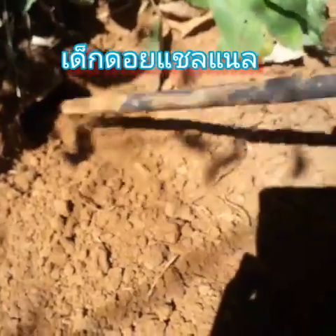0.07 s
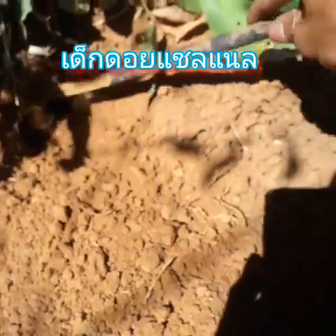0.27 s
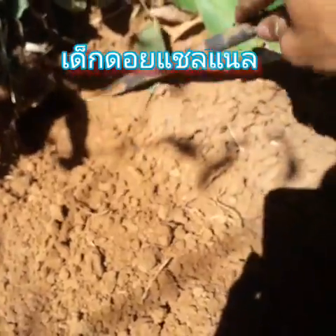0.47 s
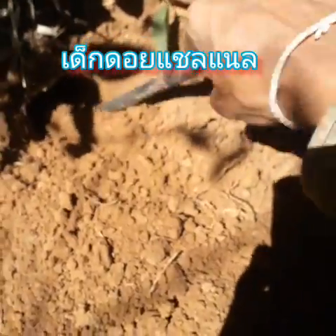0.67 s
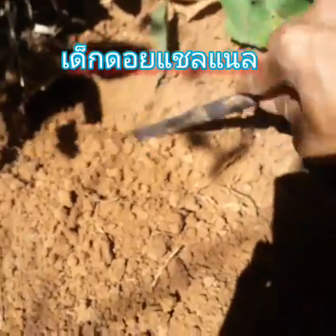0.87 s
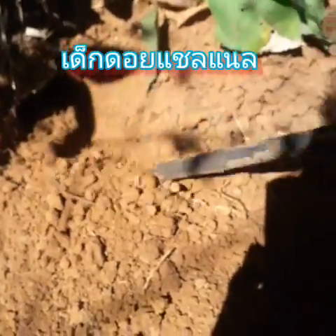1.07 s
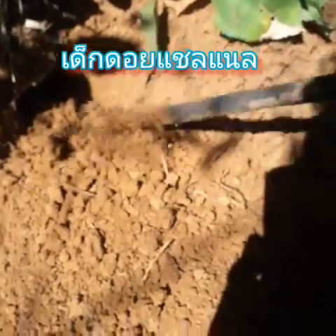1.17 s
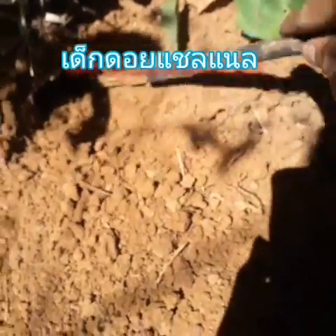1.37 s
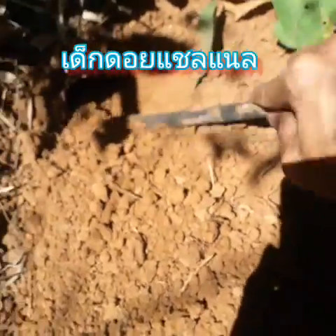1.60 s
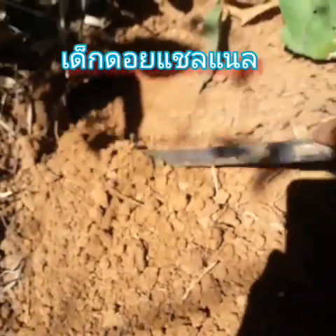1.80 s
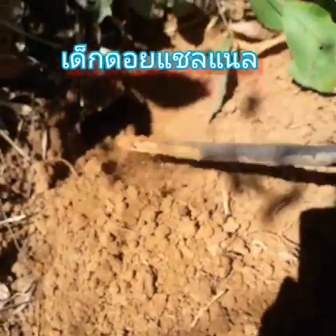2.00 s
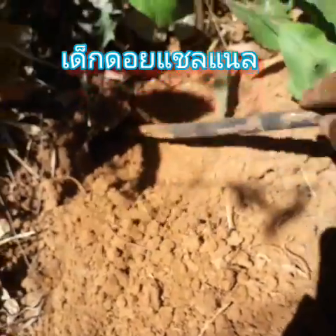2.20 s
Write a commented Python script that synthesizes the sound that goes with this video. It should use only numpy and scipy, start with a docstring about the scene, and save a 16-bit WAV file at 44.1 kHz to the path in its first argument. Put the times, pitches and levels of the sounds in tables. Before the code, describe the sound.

Digging dry earth with a hand-held blade, which knocks and drags as small clods tumble.

```python
"""A hand-held steel digging blade works dry, loose soil close by, over quiet air and faint far chirps.
At 0.2 s it strikes with a dead knock and a thud of the ground, scrapes over a hard crust, then pries
and drags through the earth: crumbs roll, sand ticks, small clods tap the steel. At 1.4 s the edge
cracks into the bank and splits a clod; a second, shorter drag follows and the soil settles."""
import sys
import numpy as np
from scipy import signal
from scipy.fft import rfft, irfft
from scipy.io import wavfile
from scipy.ndimage import uniform_filter1d, map_coordinates

SR = 44100
rng = np.random.default_rng(int(sys.argv[2]) if len(sys.argv) > 2 else 0)


def output_pcm(signal):
    """Save a mono or channel-first signal as 16-bit PCM at the path in sys.argv[1].

    Samples are clipped to [-1, 1] before scaling.
    """
    pcm = np.clip(np.atleast_2d(signal).T, -1, 1) * 32767
    wavfile.write(sys.argv[1], SR, np.round(pcm).astype(np.int16))


N = 99225

# loose earth on the move: t/s, crumb level/dB, lump level/dB, sand level/dB
EARTH_FLOW = [(0, -70, -66.5, -88), (.035, -63.5, -81, -79.5), (.09, -80, -80.5, -94),
              (.205, -99, -86, -85), (.225, -55, -56, -65), (.30, -75.5, -80.5, -81),
              (.39, -56, -68.5, -65), (.44, -67.5, -84, -75), (.51, -58, -70.5, -68.5),
              (.58, -59.5, -73.5, -72), (.67, -61.5, -71, -75), (.77, -67.5, -68, -78),
              (.88, -57.5, -62, -78), (.98, -59, -62, -74.5), (1.04, -64, -70.5, -78),
              (1.12, -63.5, -78.5, -81), (1.19, -67, -91, -75), (1.25, -65, -76, -79),
              (1.33, -74, -81, -91), (1.397, -86, -84, -74), (1.404, -50, -52, -43),
              (1.435, -47.5, -61.5, -56), (1.47, -57.5, -69, -66), (1.50, -49.5, -67, -64),
              (1.55, -60, -72.5, -65), (1.62, -67.5, -77, -76.5), (1.71, -59.5, -66, -69),
              (1.80, -57.5, -69.5, -62.5), (1.88, -58, -72, -66), (1.94, -65, -77.5, -72.5),
              (2.08, -77, -80.5, -95), (2.14, -69, -80.5, -82), (2.21, -77, -84, -81.5),
              (2.25, -72, -79, -79)]
# bright EQ of hard grit on steel: f/Hz, level/dB
GRIT_EQ = [(200, -11), (6000, -27.5), (10000, -28), (11300, -10), (13000, -3), (15500, -1), (17000, 0.5)]


def undb(db):
    """Decibels to gain."""
    return 10 ** (np.asarray(db) / 20)


def unit(x):
    """Scale to rms 1."""
    return x / np.sqrt(np.mean(x ** 2) + 1e-30)


def unit_hit(x):
    """Scale a one-shot to the energy of 10 ms at rms 1."""
    return x / np.sqrt(np.sum(x ** 2) / (SR / 100) + 1e-30)


def clock(size=8192):
    """Seconds since the start of a sound."""
    return np.arange(size) / SR


def add(out, at_s, x):
    """Mix x in at a cue time."""
    start = int(at_s * SR)
    out[start:start + len(x)] += x[:max(len(out) - start, 0)]


def fader(rows, column=1):
    """Gain over the scene from a table's dB column."""
    rows = np.array(rows)
    return undb(np.interp(clock(N), rows[:, 0], rows[:, column]))


def eq(x, points, size=2048):
    """Minimum-phase EQ through (f/Hz, level/dB) points, falling 20 dB an octave beyond the ends."""
    hz, db = np.array(points, float).T
    octave = np.log2(np.maximum(np.arange(size // 2 + 1) * SR / size, 10))
    outside = np.maximum(np.log2(hz[0]) - octave, 0) + np.maximum(octave - np.log2(hz[-1]), 0)
    cepstrum = irfft(np.log(undb(np.interp(octave, np.log2(hz), db) - 20 * outside)))
    cepstrum[1:size // 2] *= 2
    cepstrum[size // 2 + 1:] = 0
    return signal.fftconvolve(x, irfft(np.exp(rfft(cepstrum))))[:len(x)]


def lowpass(x, hz, order=2):
    """Dull the top."""
    return signal.sosfilt(signal.butter(order, hz, fs=SR, output="sos"), x)


def highpass(x, hz, order=3):
    """Thin the bottom."""
    return signal.sosfilt(signal.butter(order, hz, "high", fs=SR, output="sos"), x)


def burst(decay_s):
    """Grit crushed in a moment: dying noise with an even spectrum."""
    envelope = np.exp(-clock() / decay_s)
    noise = rng.standard_normal(len(envelope))
    for _ in range(2):  # flatten the spectrum, then the level
        noise = irfft(np.exp(1j * np.angle(rfft(noise * envelope))))
        noise /= np.sqrt(uniform_filter1d(noise ** 2, size=64).clip(1e-30))
    return unit_hit(noise * envelope)


def ring(modes):
    """Damped modes (f/Hz, t60/s, level/dB) after one push."""
    t = clock()
    return unit_hit(sum(undb(db - 60 * t / t60) * np.sin(2 * np.pi * hz * t) for hz, t60, db in modes))


def attack(rise_s):
    """Fade-in that rounds off a transient."""
    return 1 - np.exp(-clock() / rise_s)


def grains(per_s, lo_hz, hi_hz, cycles, spread_db, size=320):
    """A rain of tiny collisions, each with its own pitch and weight, dying to 1/e in `cycles`."""
    when, pitch, rank, phase = rng.random((int(per_s * N / SR), 4)).T[:, :, None]
    hz, t = lo_hz * (hi_hz / lo_hz) ** pitch, clock(size)
    gain = hz * undb(-spread_db * np.log(rank + 0.032))
    pings = gain * np.exp(-t * hz / cycles) * np.sin(2 * np.pi * (hz * t + phase))
    positions = (when * N).astype(int) + np.arange(size)
    return np.bincount(positions.ravel(), pings.ravel(), N + size)[:N]


def wobble(hz):
    """Random movement slower than about hz, at rms 1."""
    return unit(lowpass(rng.standard_normal(N), hz))


def slips(hz, max_db):
    """Gain flutter of earth giving way in small uneven slips."""
    return undb(max_db * np.tanh(wobble(hz) / 2))


def noise_bed(points, db):
    """Steady EQ'd noise at an rms level."""
    return undb(db) * unit(eq(rng.standard_normal(N), points))


def scatter(x, decay_s):
    """Smear a sound with dense, short reflections."""
    echo = burst(decay_s)
    return signal.fftconvolve(x, echo / np.linalg.norm(echo))[:N]


def outdoors():
    """Quiet air with a soft low rumble and a faint, narrow far whine."""
    air_eq = [(15, -32), (25, -18.5), (117, 7), (256, -13), (714, -9), (1290, -4), (1700, -11.5),
              (2280, -8.5), (3250, -24.5), (4490, -1.5), (5880, -8), (6740, -6), (9320, -22),
              (14800, -15.5), (16000, -15)]  # open air: f/Hz, level/dB
    rumble_eq = [(25, -23.5), (55, -4.5), (100, -3), (160, -0.5), (260, -20), (1000, -60.5)]  # low rumble: f/Hz, level/dB
    whine = unit(wobble(70) * np.sin(2 * np.pi * 1297 * clock(N)))
    return noise_bed(air_eq, db=-70.5) + noise_bed(rumble_eq, db=-75.5) + undb(-78.5) * whine


def far_chirps(trim_db=-3.5, fall_share=0.03):
    """Thin, raspy, slightly falling chirps from far off, blurred by the foliage."""
    calls = [(0.026, 0.02, 2134, -61, 0.025), (0.415, 0.034, 6800, -69, 0.027),
             (0.487, 0.072, 6260, -67, 0.016), (.73, 0.057, 7100, -68.5, 0.041),
             (1.024, 0.064, 7230, -68, .04), (1.188, 0.059, 7130, -66.5, 0.043),
             (1.337, 0.066, 7100, -69, 0.025), (1.637, 0.047, 6970, -68, 0.036),
             (1.751, 0.13, 6350, -62.5, 0.014), (1.947, 0.07, 7050, -70, .04),
             (2.112, 0.077, 6900, -70.5, 0.038)]  # t/s, length/s, f/Hz, level before trim/dB, rasp/share of pitch
    out = np.zeros(N)
    for at, length, hz, db, rasp in calls:
        n = int(length * SR)
        pitch = hz * (1 + rasp * wobble(500)[:n] + fall_share * np.linspace(.5, -.5, n))
        tone = np.sin(2 * np.pi * np.cumsum(pitch) / SR)
        add(out, at, undb(db + trim_db) * unit(np.hanning(n) ** .5 * tone))
    return scatter(out, decay_s=0.012)


def running_sand():
    """Fine sand runs over the steel in a high sizzle."""
    sand = eq(grains(per_s=3000, lo_hz=9500, hi_hz=17300, cycles=3.4, spread_db=3), GRIT_EQ)
    return fader(EARTH_FLOW, column=3) * unit(sand * slips(120, max_db=4))


def tumbling_lumps():
    """Bigger lumps tumble with a low patter."""
    lump_eq = [(60, 5.5), (130, -2.5), (350, 3.5), (520, -2), (720, -9), (1100, -3), (1600, -19.5),
               (4000, -33)]  # dull body of the lumps: f/Hz, level/dB
    lumps = grains(per_s=1500, lo_hz=104, hi_hz=1860, cycles=1.64, spread_db=1.5, size=900)
    return fader(EARTH_FLOW, column=2) * unit(eq(lumps, lump_eq))


def rolling_crumbs():
    """Dry crumbs roll and collide in a dense rustle."""
    crumb_eq = [(410, -46.5), (700, -11), (861, -12), (1070, -8.5), (1400, -9), (2090, -3.5), (2400, 0),
                (2820, -2.5), (3130, -5.5), (3470, -1), (5080, -6), (6470, -5.5), (8740, -16), (9470, -27),
                (11000, -39), (14300, -59.5)]  # dry rustle: f/Hz, level/dB
    crumbs = eq(grains(per_s=4500, lo_hz=690, hi_hz=10740, cycles=1.72, spread_db=0.5), crumb_eq)
    return fader(EARTH_FLOW, column=1) * unit(crumbs * slips(90, max_db=2))


def blade_drag(stroke_s=1.2, in_tune_s=0.78, sag_per_s=0.25):
    """Crumbs drag along the flat of the blade; its resonances sag as each stroke draws it back."""
    strokes = [(.60, -72), (.66, -60), (.78, -56.5), (.88, -55), (.98, -56.5), (1.05, -60.5), (1.14, -84),
               (1.66, -69.5), (1.78, -62.5), (1.89, -61.5), (1.96, -75)]  # swell of the two strokes: t/s, level/dB
    body_eq = [(700, -23.5), (1110, -2), (1400, -19.5), (1760, -5), (2100, -11), (2600, 0), (2900, 1),
               (3150, -4), (3500, -0.5), (4000, -5), (4600, -18), (8000, -29)]  # blade resonances before the pitch bend: f/Hz, level/dB
    crumbs = eq(grains(per_s=4000, lo_hz=802, hi_hz=7160, cycles=4.1, spread_db=0.5), body_eq)
    speed = np.exp(-sag_per_s * (clock(N) % stroke_s - in_tune_s))
    bent = map_coordinates(crumbs, [np.cumsum(speed)], mode="mirror")
    return fader(strokes) * unit(bent * slips(110, max_db=4))


def crust_scrape():
    """Dense catches of steel on a hard crust, pressed harder until the blade slips free."""
    pressure = [(.3305, -75), (.3325, -48.5), (.338, -51.5), (.347, -48.5), (.356, -41.5), (.3595, -52),
                (.366, -72)]  # swell of the slide: t/s, level/dB
    crust_eq = [(200, -20), (600, -25), (1300, -12), (1600, -24), (2100, -9), (2550, 0.5), (3100, -7.5),
                (3850, -1), (5000, -9), (6600, -6), (7500, -5), (8700, -6.5), (10300, -31), (13500, -15),
                (16000, -23)]  # steel on crust: f/Hz, level/dB
    t = clock(N)
    touching = (t > pressure[0][0]) & (t < pressure[-1][0])
    catches = grains(per_s=6000, lo_hz=920, hi_hz=15500, cycles=1.8, spread_db=1)
    return touching * fader(pressure) * unit(eq(catches, crust_eq))


def crumb_clicks(ring_cycles=17, note_db=0.5):
    """Single crumbs click on the blade, each with its own brief pitch; hard grit adds a sharp tick."""
    cues = [(0.216, -39, 3680, -52, 0.0035), (.3553, -47, 3900, -68, .0015),
            (.3805, -44.5, 6500, -72, 0.003), (0.4712, -57, 3000, -66, 0.004),
            (0.499, -51.5, 2870, -76, 0.004), (0.5609, -59.5, 6600, -75, 0.002),
            (.5970, -62, 6500, -51.5, 0.0008), (0.611, -65, 6500, -58, 0.0011),
            (0.6162, -59, 6000, -62, 0.0048), (0.6495, -62, 3120, -67, 0.0022),
            (0.8606, -51, 4130, -76, 0.0021), (0.8784, -55, 3020, -76, 0.0048),
            (.9268, -63, 6800, -80, 0.0019), (0.9351, -53.5, 2930, -80, 0.0024),
            (0.9487, -58, 4500, -80, .001), (1.1552, -60.5, 4640, -59.5, 0.0027),
            (1.1542, -52, 7770, -66, 0.0022), (1.2672, -59, 6200, -71, 0.0013),
            (1.4001, -57, 6600, -27.5, 0.00081), (1.4088, -46, 5470, -58, 0.0021),
            (1.413, -51, 5800, -63, .001), (1.4201, -56, 6500, -43.5, .0007),
            (1.4408, -53, 3800, -64, 0.0053), (1.49, -48, 5540, -74, 0.0015),
            (1.5255, -54, 3030, -59, 0.0036), (1.5290, -53.5, 2400, -62, 0.002),
            (1.5679, -53, 5070, -58, 0.0036), (1.751, -67, 6500, -53.5, 0.0025),
            (1.7660, -54.5, 3400, -56, 0.0044), (1.8544, -58, 3650, -55, 0.0023),
            (2.231, -63.5, 4530, -70, 0.0084)]  # crumb hits: t/s, click level/dB, f/Hz, tick level/dB, decay/s
    click_eq = [(200, -31), (900, -8.5), (2000, 0), (3000, -4), (4200, 2), (5300, 2), (6800, 5.5),
                (8300, -8), (10000, -22), (16000, -43)]  # crumb on steel: f/Hz, level/dB
    out = np.zeros(N)
    for at, click_db, hz, tick_db, decay in cues:
        force = burst(decay) * attack(0.00057)
        mode = np.gradient(ring([(hz, ring_cycles / hz, 0)]))
        note = lowpass(signal.fftconvolve(force, mode)[:len(force)], 8030, order=6)
        click = unit_hit(unit_hit(eq(force, click_eq)) + undb(note_db) * unit_hit(note))
        tick = unit_hit(eq(burst(decay), GRIT_EQ))
        add(out, at, undb(click_db) * click + undb(tick_db) * tick)
    return out


def clod_taps():
    """Small soft clods tap the blade, each with one short, rounded note."""
    cues = [(.7940, -50.5, 2560, 0.013), (.8448, -54, 2900, 0.006), (.9040, -54.5, 3100, 0.0068),
            (.9390, -58, 3000, .008), (.9740, -55, 2650, .012), (1.0068, -57, 2750, .008),
            (1.4855, -46, 2450, 0.0074), (1.4948, -40, 3220, 0.0062), (1.503, -49.5, 2540, .007),
            (1.9138, -62, 2390, .012), (1.9878, -58.5, 2476, .014)]  # clod hits: t/s, level/dB, f/Hz, t60/s
    out = np.zeros(N)
    for at, db, hz, t60 in cues:
        add(out, at, undb(db) * unit_hit(ring([(hz, t60, 0)]) * attack(0.0005)))
    return out


def ground_thuds(grit_db=-13):
    """The ground gives under the blade: a low, damped, slightly rough swing."""
    cues = [(0.2119, -46, 350, 0.034), (.2140, -48, 602, 0.045), (0.218, -43.5, 165.5, 0.11),
            (0.2283, -46.5, 235, 0.044), (.383, -57, 146, 0.047), (0.387, -58.5, 80, 0.096),
            (0.509, -61.5, 133, 0.064), (0.793, -57.5, 433, .018), (.972, -59, 94, 0.14),
            (1.212, -61.5, 111, 0.084), (1.232, -60.5, 69.6, 0.087), (1.262, -62.5, 80, 0.1),
            (1.4011, -53.5, 147, 0.038), (1.441, -54, 145, 0.04), (1.490, -59, 219, 0.079),
            (1.567, -53.5, 70.4, 0.069), (1.618, -59.5, 84.5, 0.091), (1.765, -59, 89, 0.14)]  # thuds: t/s, level/dB, f/Hz, t60/s
    out = np.zeros(N)
    for at, db, hz, t60 in cues:
        grit = highpass(lowpass(burst(t60 / np.log(1000)), 2.76 * hz, order=4), hz / 2)
        thud = ring([(hz, t60, 0)]) + undb(grit_db) * unit_hit(grit)
        add(out, at, undb(db) * unit_hit(thud * attack(0.0017)))
    return highpass(out, 48)


def bank_chop(clod_at_s=1.4022, clod_db=-40):
    """The edge cracks into the bank and a clod splits with a hollow note."""
    cues = [(1.4008, -32.5, 0.00057), (1.4030, -41, 0.0018), (1.4243, -49, 0.0022)]  # cracks: t/s, level/dB, decay/s
    crack_eq = [(59, -48), (100, -10), (424, -2), (882, -3), (1940, 8), (2270, 5.5), (2750, -4.5),
                (4040, 4), (5190, -13), (6540, 3), (7070, -7), (7780, -3.5), (8410, -19), (9080, -12),
                (10000, -10), (13000, -57)]  # breaking earth: f/Hz, level/dB
    clod_modes = [(590, 0.021, -3), (1270, 0.027, 6.5), (1684, 0.049, 3), (2020, .02, 0.5)]  # the splitting clod: f/Hz, t60/s, level/dB
    out = np.zeros(N)
    for at, db, decay in cues:
        add(out, at, undb(db) * unit_hit(eq(burst(decay), crack_eq)))
    add(out, clod_at_s, undb(clod_db) * ring(clod_modes))
    return out


def blade_knocks(ring_share=0.56, tail_db=-22, tail_s=0.011):
    """Each knock is a push plus a short grind; it rings the blade and scatters off the ground."""
    # blade on hard earth: t/s, level/dB, grind decay/s, grind share, high cut/Hz, low cut/Hz
    cues = [(0.2114, -41.5, 0.0033, 1, 6100, 1510), (0.2151, -28, 0.0018, 0.48, 10400, 2200),
            (0.371, -54, 0.0034, 0.49, 7000, 1790), (0.3798, -34, 0.0015, 0.82, 3770, 1210),
            (0.3826, -43.5, 0.0035, 0.9, 2670, 1120), (0.5083, -46, 0.003, 0.53, 3240, 400),
            (0.7940, -49.5, 0.001, 0.53, 3030, 2340), (1.4939, -46, 0.0038, 1, 7000, 2980)]
    blade_modes = [(600, .03, -22), (1080, .025, -22), (1335, .028, -20), (2390, .022, 0), (2850, .012, -6),
                   (3210, .014, 1), (3800, .011, 1), (4100, .012, -5), (4650, .014, -11), (6000, .012, -7),
                   (6650, .01, -14), (7300, .012, -13), (8680, .011, -14)]  # steel damped by the soil: f/Hz, t60/s, level/dB
    contact_eq = [(100, -14), (600, -28), (1000, -35), (1950, -28), (2450, 20), (3800, 8.5), (5200, 1),
                  (7500, -14), (10500, -37), (14000, -15), (16000, -24)]  # dead contact of steel and earth: f/Hz, level/dB
    out, steel = np.zeros(N), ring(blade_modes)
    push = unit_hit(signal.unit_impulse(len(steel)))
    for at, db, decay, grind, top_hz, low_hz in cues:
        force = (1 - grind) * push + grind * burst(decay)
        ringing = unit_hit(signal.fftconvolve(force, steel)[:len(force)])
        contact = unit_hit(eq(force, contact_eq))
        knock = unit_hit(ring_share * ringing + (1 - ring_share) * contact)
        knock += undb(tail_db) * unit_hit(eq(burst(tail_s), contact_eq))
        add(out, at, undb(db) * unit_hit(highpass(lowpass(knock, top_hz), low_hz)))
    return out


def scene():
    """Everything sits dead centre; ground reflections and the open air give a trace of width."""
    width_eq = [(30, -30), (120, -31), (300, -51), (700, -28), (1200, -32), (2500, -55), (4500, -26),
                (8000, -23), (15000, -35)]  # reflections, side against mid: f/Hz, level/dB
    wide_air_eq = [(18, -34), (30, -2), (359, -12), (505, -14), (787, -13.5), (2690, -14), (3230, -7.5),
                   (5170, -3.5), (7260, -8), (10200, -9), (12300, -4), (15500, -6.5)]  # diffuse air: f/Hz, level/dB
    strikes = blade_knocks() + bank_chop() + ground_thuds()
    debris = clod_taps() + crumb_clicks() + rolling_crumbs() + tumbling_lumps() + running_sand()
    mid = strikes + debris + crust_scrape() + blade_drag() + far_chirps() + outdoors()
    side = eq(scatter(mid, decay_s=0.0017), width_eq) + noise_bed(wide_air_eq, db=-79)
    return np.array([mid + side, mid - side])


def record(dry, top_hz=15900):
    """A steep high cut on the whole mix."""
    return signal.sosfilt(signal.ellip(10, .2, 80, top_hz, fs=SR, output="sos"), dry)


dry = scene()
out = record(dry)
output_pcm(out)
```